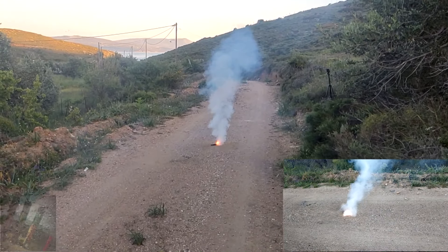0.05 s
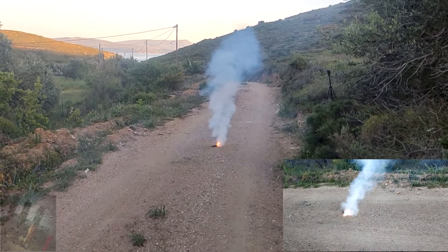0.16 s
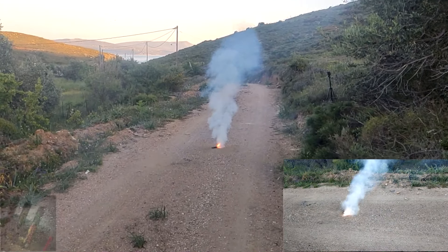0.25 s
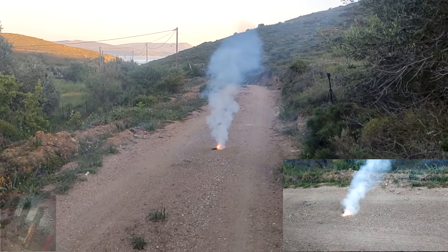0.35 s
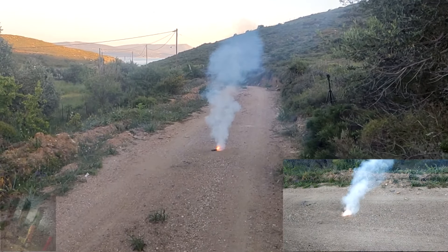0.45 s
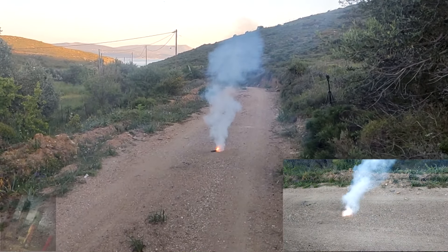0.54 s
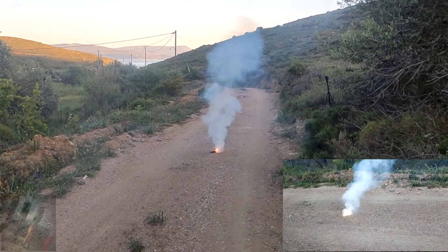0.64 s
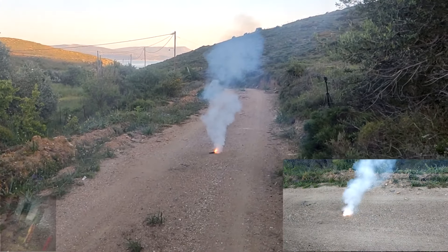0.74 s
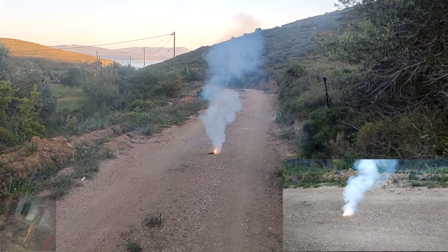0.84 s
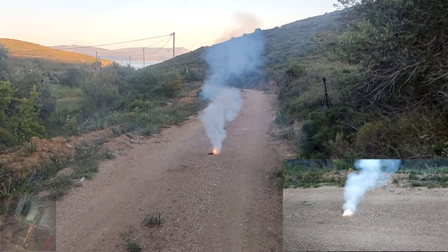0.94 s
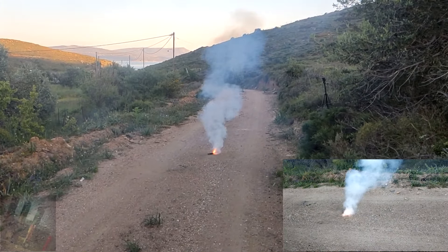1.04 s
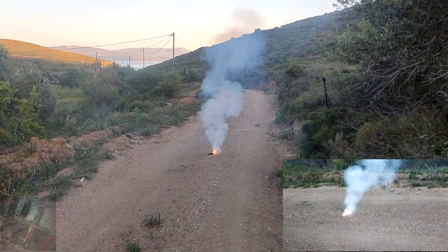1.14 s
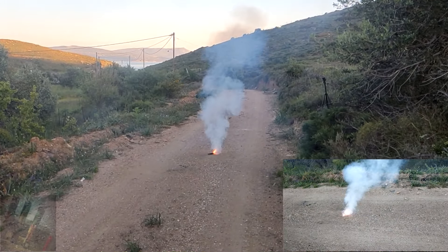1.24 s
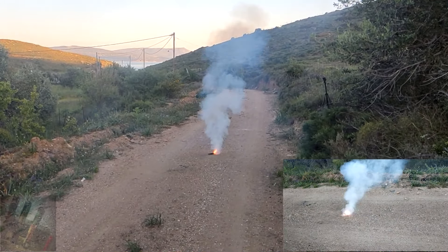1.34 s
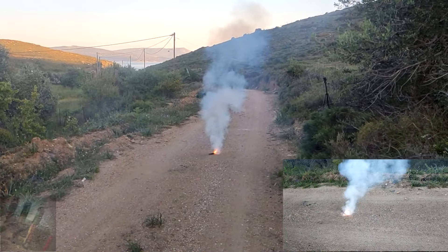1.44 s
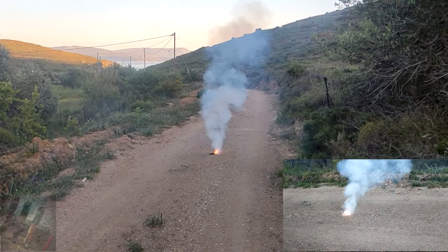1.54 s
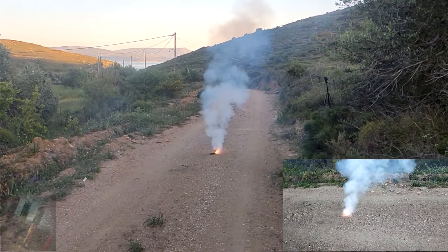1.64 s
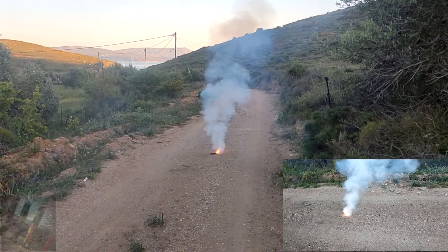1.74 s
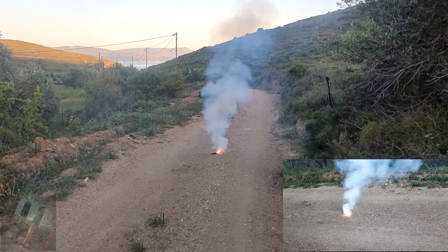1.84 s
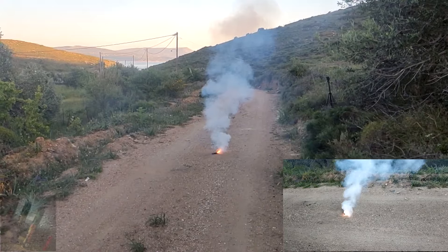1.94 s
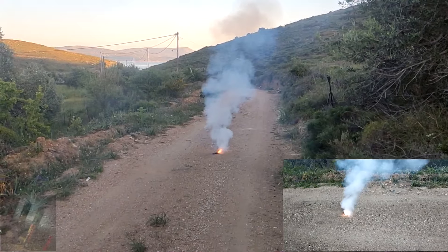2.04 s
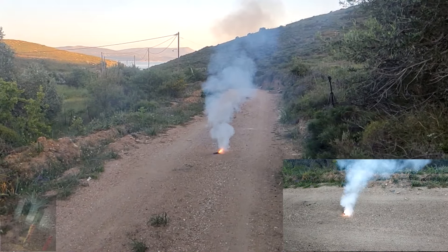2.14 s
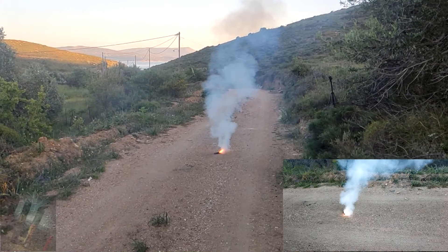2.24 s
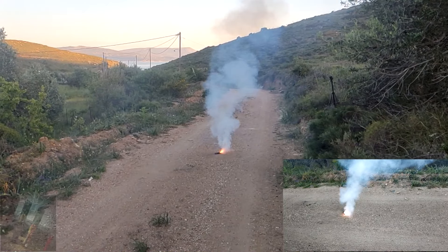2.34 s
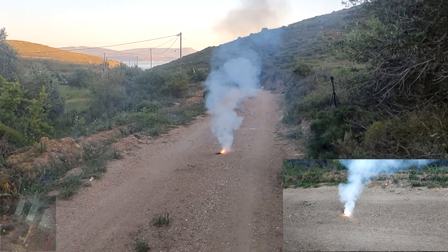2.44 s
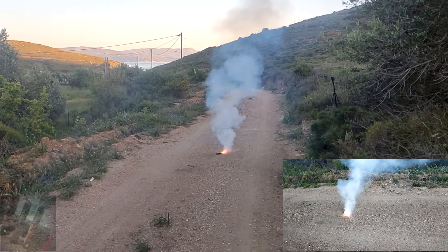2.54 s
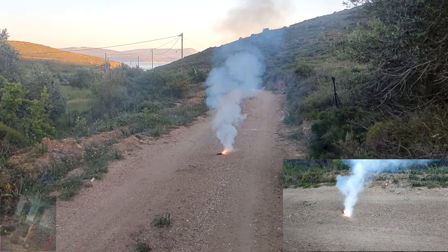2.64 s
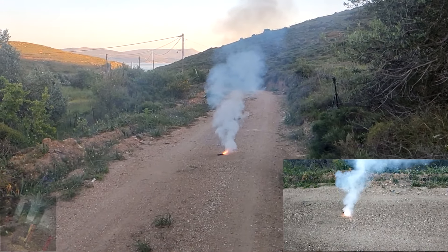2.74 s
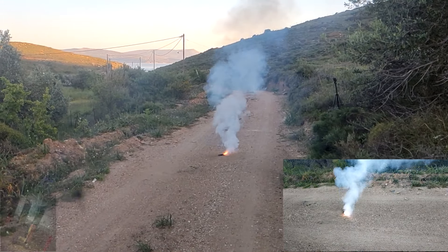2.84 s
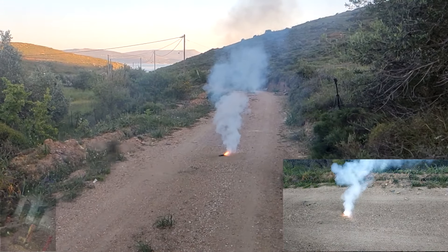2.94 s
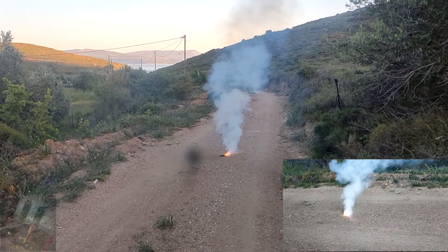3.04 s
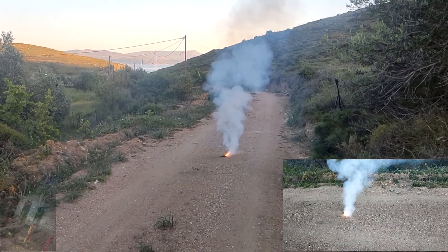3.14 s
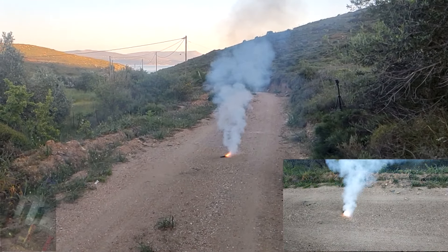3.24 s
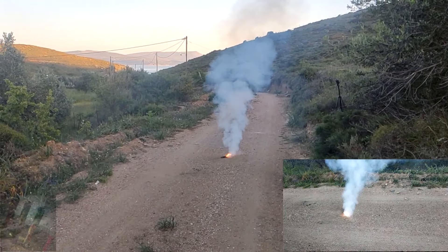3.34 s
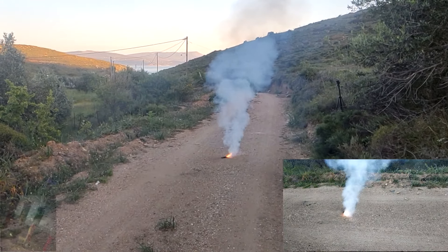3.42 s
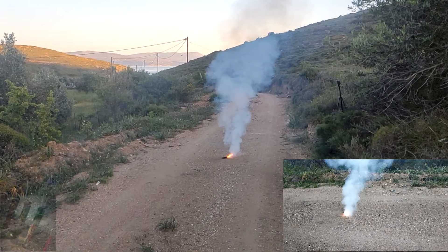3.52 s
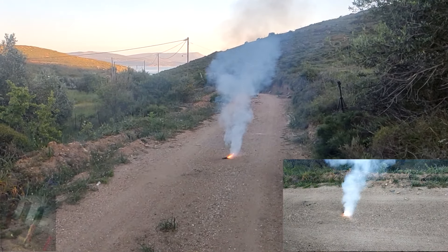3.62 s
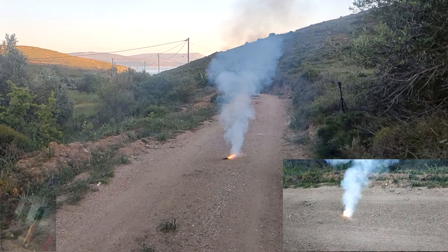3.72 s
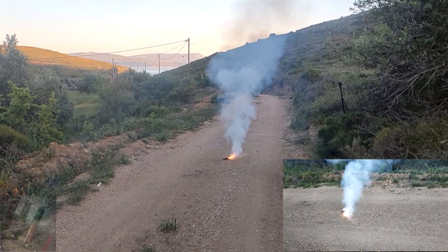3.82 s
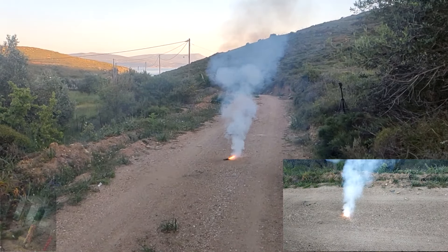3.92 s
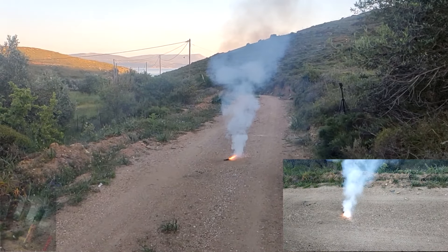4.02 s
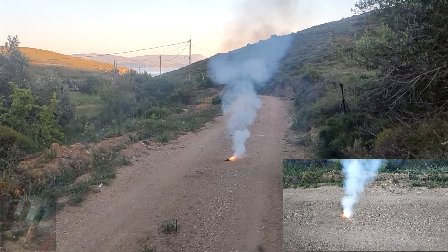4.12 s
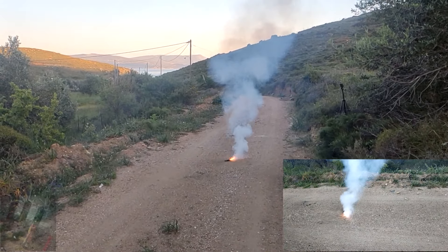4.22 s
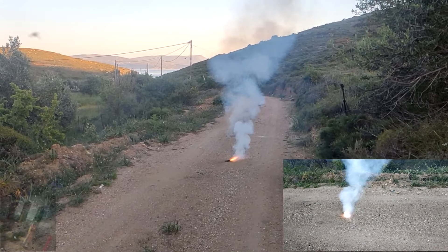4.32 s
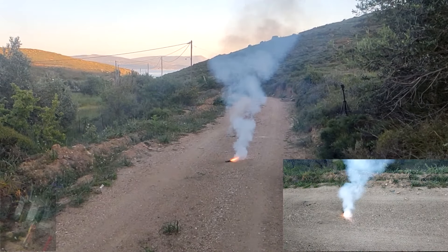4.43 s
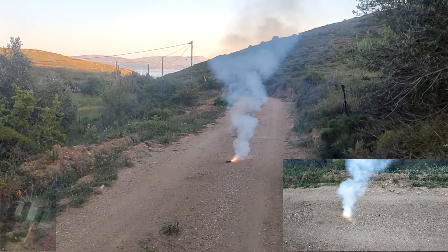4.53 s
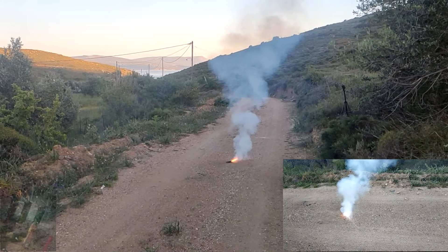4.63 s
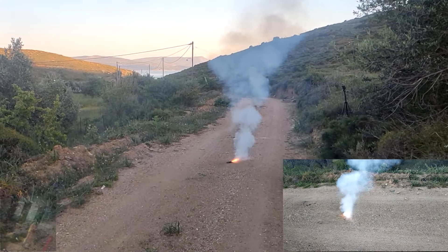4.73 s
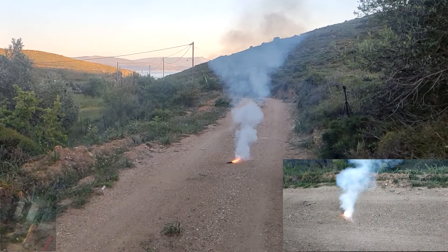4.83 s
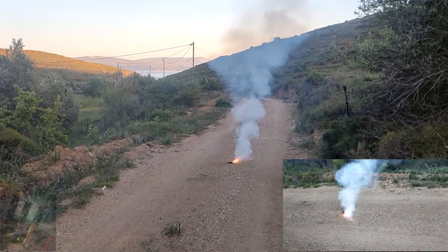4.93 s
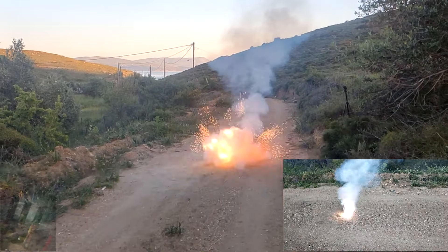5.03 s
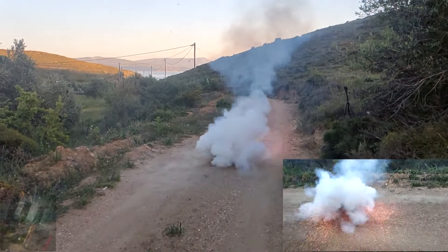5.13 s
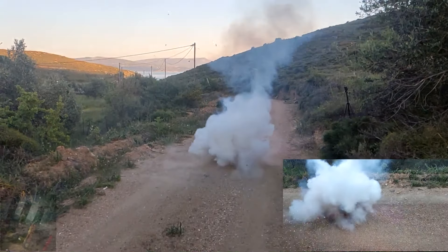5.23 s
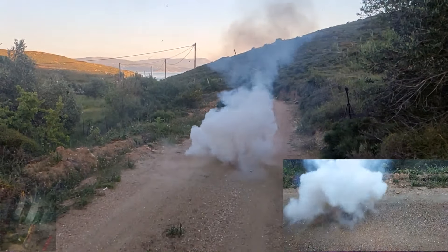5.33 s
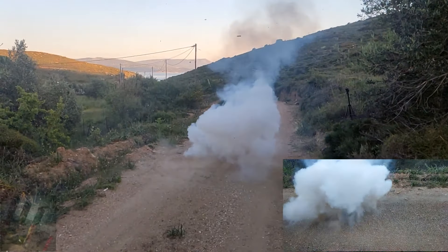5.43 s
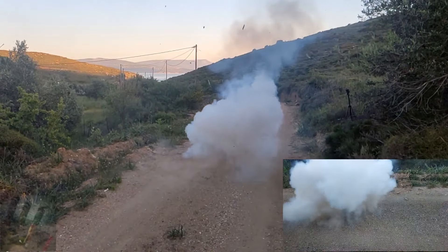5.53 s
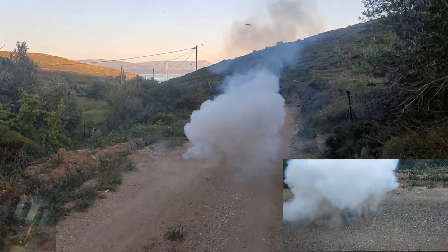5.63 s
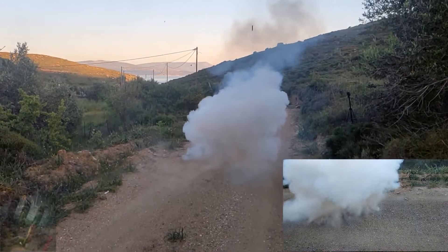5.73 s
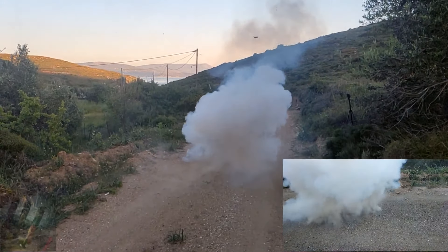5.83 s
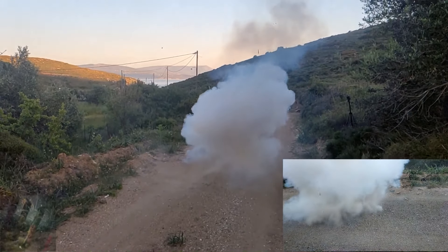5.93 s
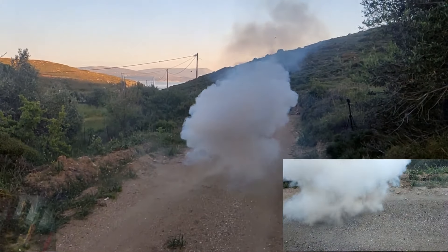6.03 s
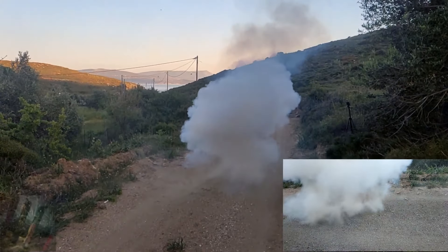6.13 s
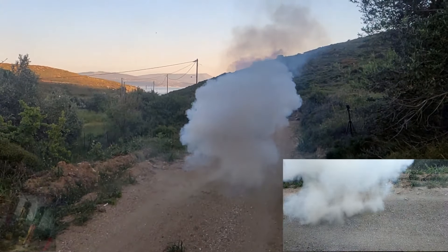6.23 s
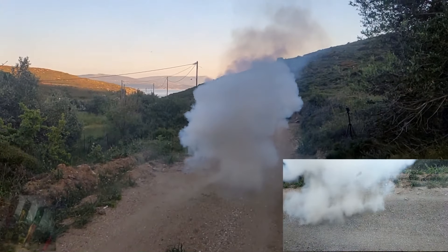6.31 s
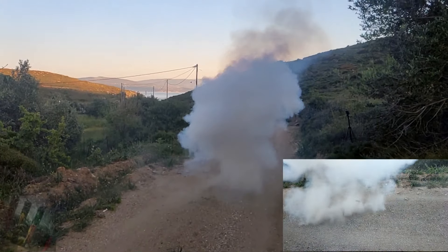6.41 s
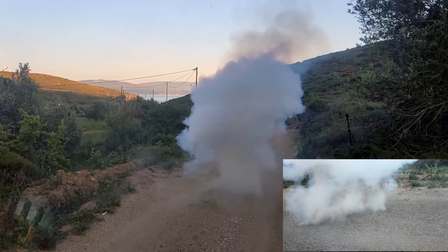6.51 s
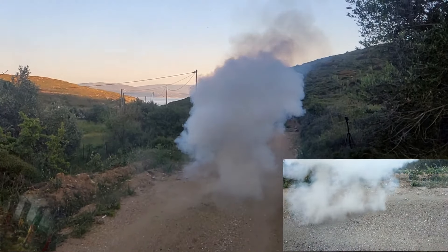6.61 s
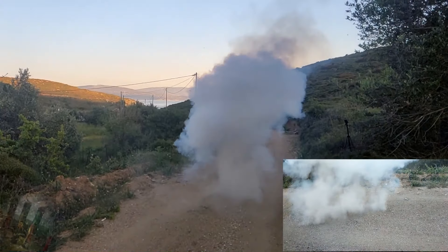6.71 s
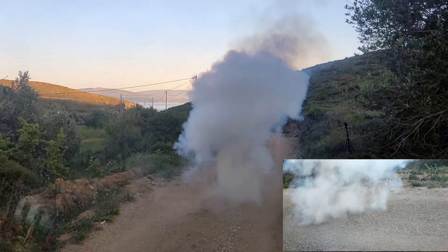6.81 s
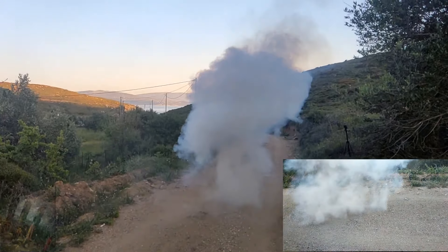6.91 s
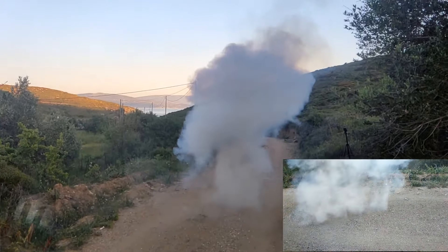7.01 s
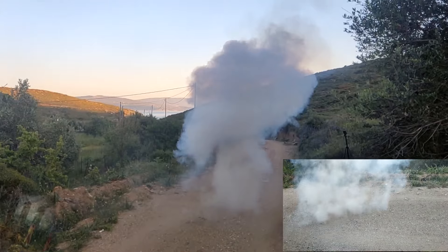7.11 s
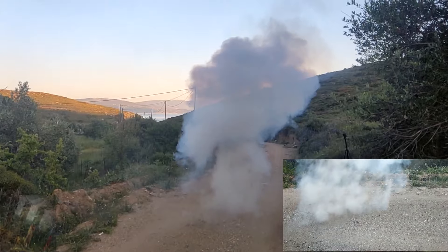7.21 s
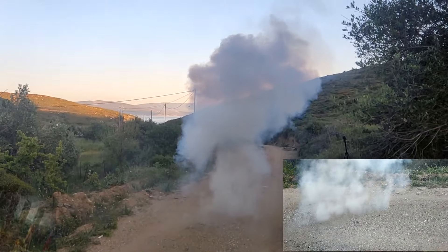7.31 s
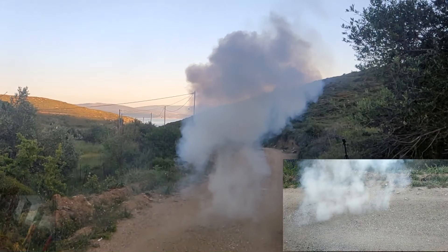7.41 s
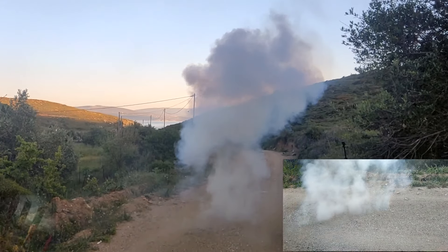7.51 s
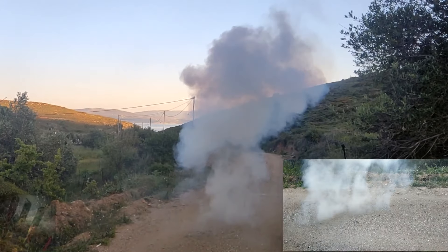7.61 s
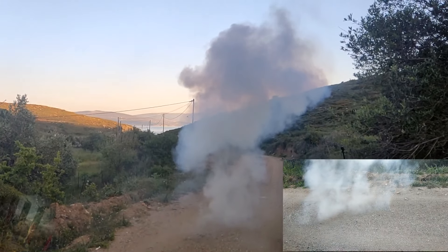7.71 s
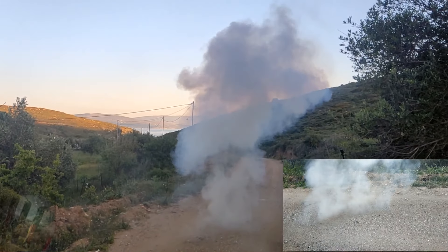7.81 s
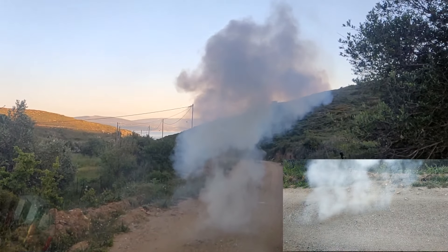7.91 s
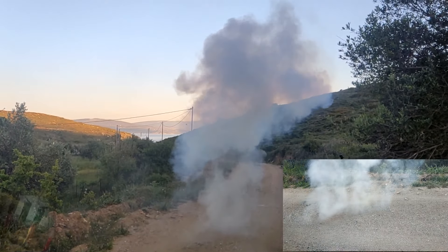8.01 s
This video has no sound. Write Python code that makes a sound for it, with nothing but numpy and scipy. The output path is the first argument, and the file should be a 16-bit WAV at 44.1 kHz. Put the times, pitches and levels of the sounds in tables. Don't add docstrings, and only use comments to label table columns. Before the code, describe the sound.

From 0 to 5.1 seconds a firecracker fuse hisses steadily on a dirt road, a bright gas jet that turns fuller and throatier between about 1.2 and 3.6, with a low fluttering flame slowly growing. Irregular dry snaps and ticks spit from it, strongest from 4.3 onward. A faint hand bump comes at 1.2; a cricket gives thin, high rasping chirps from 1.7 to 3.2. At 5.12 a single violent bang clips the phone microphone, with tightly packed ground bounces. Dense echoes roar back, with hard slaps on the right around 5.4 to 5.55, more near 5.7 to 5.85, and another clear one at 6.05. The roll grows duller and falls away by 6.5. Cricket chirps return from 5.7, grit ticks and dust patters, and a soft far-ridge rumble lingers after 6.8, over faint airy hiss.

```python
import sys
import numpy as np
from scipy import signal
from scipy.fft import rfft, irfft
from scipy.io import wavfile
from scipy.ndimage import uniform_filter1d

SR = 44100
rng = np.random.default_rng(int(sys.argv[2]) if len(sys.argv) > 2 else 0)


def wrap_up_sound(samples):
    columns = np.atleast_2d(samples).T
    tamed = np.clip(columns, -1, 1)
    steps = np.round(tamed * 32767).astype(np.int16)
    wavfile.write(sys.argv[1], SR, steps)


def voltage_ratio(level):
    return 10 ** (np.asarray(level, float) / 20)


N = 355446
T = np.arange(N) / SR
BANG_S = 5.1218
PORT_LAG = 19


def unit(x):
    return x / np.sqrt(np.mean(x ** 2))


def noise():
    return rng.standard_normal(N)


def colour(x, points):
    hz, db = np.transpose(points)
    grid_hz = np.arange(2049) * SR / 4096
    gain_db = np.interp(np.log(grid_hz + 1), np.log(hz), db)
    cepstrum = irfft(gain_db * np.log(10) / 20)
    cepstrum[1:2048] *= 2
    cepstrum[2049:] = 0
    impulse = irfft(np.exp(rfft(cepstrum)))
    return signal.fftconvolve(np.atleast_2d(x), impulse[None], axes=1)[:, :N]


def band(x, lo_hz, hi_hz, order=2):
    edges_hz = [lo_hz, min(hi_hz, .45 * SR)]
    return signal.sosfilt(signal.butter(order, edges_hz, "bandpass", fs=SR, output="sos"), x)


def walk(rate_hz):
    k = int(SR / rate_hz)
    held = np.repeat(rng.standard_normal(N // k + 1), k)
    return uniform_filter1d(uniform_filter1d(held, k), k)[:N]


def clicks(rate_hz, spread_db, size=N):
    u, big = rng.random(size), rng.exponential(size=size)
    sign = np.where(u * SR / rate_hz < .5, 1, -1)
    return unit((u < rate_hz / SR) * voltage_ratio(spread_db * np.minimum(big, 4)) * sign)


def pair(one, alike, lag=0):
    same, a = one(), np.clip(alike, 0, 1)
    shared = np.array([np.roll(same, lag), same])
    return np.sqrt(a) * shared + np.sqrt(1 - a) * np.array([one(), one()])


def add(out, start_s, sound):
    i = int(start_s * SR)
    out[:, i:i + sound.shape[1]] += sound[:, :N - i]


def sides(pan_db):
    return voltage_ratio(np.array([[pan_db / 2], [-pan_db / 2]]))


# [hz, level_db]
FRESH_JET = [(700, -38.5), (1500, -11.5), (2800, -9.5), (4100, -7), (5500, -4.5), (6800, -4), (8000, -6),
             (9200, -10), (10200, -7.5), (11400, -9.5), (12500, -10), (14500, -10.5)]
# [hz, level_db]
BURNT_JET = [(500, -21), (850, -4.5), (1300, -16.5), (1600, -5), (2000, -8.5), (3300, -3.5), (4200, 0),
             (6000, -4), (7300, -7.5), (9100, -10.5), (10200, -10), (11400, -8), (12500, -9.5), (14500, -6)]
# [hz, level_db]
FLAME = [(24, -40.5), (40, -4.5), (173, 2), (322, -4), (384, -12), (528, -5), (681, -8), (865, -24),
         (1060, -16.5), (1640, -25.5), (1800, -40.5), (2340, -47), (3960, -120)]
# [start_s, peak_db, left_minus_right_db]
SPITS = [(0.068, -32, -13), (0.111, -25, -9), (0.8787, -34.5, -1), (1.1697, -29, -7), (1.1899, -25.5, -2),
         (1.2411, -29, -1), (1.3102, -27, -5.5), (1.3969, -21, -3), (1.497, -26.5, -1.5), (2.1189, -27, -8),
         (2.3784, -25.5, -7), (2.743, -27.5, -0.5), (2.9585, -27.5, -2), (3.2094, -27, 6.5),
         (3.3936, -23, -1.5), (3.492, -28, -4.5), (3.6122, -27, -5), (3.6747, -27.5, -2.5),
         (3.9373, -28, -6.5), (3.9845, -24, -4), (4.0868, -27.5, -2), (4.2788, -15, -6), (4.358, -17.5, -2),
         (4.4638, -23, -5), (4.6006, -29.5, -4.5), (4.6395, -24, -4), (4.8689, -19.5, -6),
         (4.9368, -27, -2), (5.0045, -24.5, -2.5)]
# [start_s, peak_db]
TICKS = [(0.3588, -33), (0.397, -28.5), (0.606, -30), (0.726, -31), (1.0193, -31.5), (1.0548, -29),
         (1.0861, -32.5), (1.136, -31), (1.23, -36), (1.4674, -33.5), (1.5523, -31.5), (2.164, -31),
         (2.186, -30), (2.247, -31), (2.3003, -32), (2.4725, -33), (2.705, -31), (2.863, -32.5),
         (3.092, -32), (3.291, -31.5), (3.499, -30.5), (3.802, -37.5), (3.8122, -28.5), (3.867, -30),
         (3.9723, -30.5), (4.2321, -28.5), (4.564, -32.5), (4.6269, -30), (4.9038, -30), (4.968, -34),
         (0.1286, -37), (0.5372, -40.5), (0.7048, -35), (1.1158, -36.5), (1.9751, -42), (2.0545, -34),
         (2.3511, -32.5), (2.5441, -34.5), (2.6038, -38), (3.2091, -31), (3.211, -31.5), (3.181, -36.5),
         (3.195, -35.5), (3.1992, -34.5), (3.2864, -35.5), (3.5251, -37), (3.5441, -33.5), (3.747, -32),
         (3.914, -38.5), (4.2534, -35), (4.4487, -31.5), (4.7314, -32.5), (4.8394, -39.5), (4.885, -33.5),
         (5.0614, -37), (5.077, -37)]
# [start_s, peak_db]
POPS = [(1.3972, -46), (4.6, -16.5), (4.8394, -48.5), (2.9, -22.5), (4.6394, -35), (3.1, -34.5),
        (4.358, -35.5), (4.8692, -27.5), (5.0045, -37)]


def fuse():
    jet_db = -58 + 9.5 * np.exp(-T / 0.0222)
    flame_db = -59.5 + 1.0557 * T + 2 * np.exp(-np.abs(BANG_S - T) / .1)
    sparks = pair(lambda: clicks(1400, 2.2), 0.85)
    gas = pair(noise, 0.22) * voltage_ratio(1.5 * walk(22)) + 0.85 * sparks
    burnt = np.clip((T - 1.2) / 2.4, 0, 1)
    jet = (1 - burnt) * unit(colour(gas, FRESH_JET)) + burnt * unit(colour(gas, BURNT_JET))
    flame = unit(colour(pair(noise, 0.922), FLAME)) * voltage_ratio(1.8 * walk(17))
    out = (T < BANG_S) * (jet * voltage_ratio(jet_db) + flame * voltage_ratio(flame_db))

    snap, thud = np.zeros((2, 2, N))
    for start_s, peak_db, pan_db in SPITS:
        add(snap, start_s + 0.0013, voltage_ratio(peak_db + 2) * sides(pan_db + 4.5))
    for start_s, peak_db in TICKS:
        add(snap, start_s + 0.0023, voltage_ratio(peak_db + 1.37) * sides(-1.5))
    for start_s, peak_db in POPS:
        add(thud, start_s + 0.001492, voltage_ratio(peak_db) * sides(0))
    thud = thud + voltage_ratio(-34) * snap.mean(axis=0)
    t = np.arange(2000) / SR
    decay = np.exp(-t / 0.0022) * voltage_ratio(-26) + np.exp(-t / 0.018) * voltage_ratio(-37.5)
    smear = rng.standard_normal((2, 2000)) * decay
    snap = snap + signal.fftconvolve(snap, smear, axes=1)[:, :N]
    return out + band(snap, 1900, 11000, order=1) + band(thud, 990, 2550)


# [hz, level_db]
VALLEY = [(530, -26), (900, 3.5), (3290, -6.5), (4600, -14.5), (4990, -4.5), (7140, -16.5), (10600, -11),
          (14300, -2.5)]


def air():
    hiss = unit(colour(rng.standard_normal((2, N)), [(300, -41.0)] + VALLEY)) * voltage_ratio(-67.5)
    wind = unit(band(pair(noise, .4), 4, 45)) * voltage_ratio(-67 + 3 * walk(7.5)) * sides(3)
    drift = unit(band(pair(noise, 0.59), 0.978, 4.6, order=1)) * voltage_ratio(-54) * sides(5.4)
    since_s = np.clip(T - 1.215, 0, None)
    bump = voltage_ratio(-38.5) * np.sin(2 * np.pi * 45 * since_s) * np.exp(-since_s / 0.0356)
    return hiss + wind + drift + bump


# [start_s, level_db]
CHIRPS = [(1.729, -54.5), (1.7832, -45.5), (1.9527, -47.5), (2.1271, -45.5), (2.2962, -46.5), (2.4663, -48),
          (2.6452, -47.5), (2.819, -48), (3.005, -46.5), (3.1889, -46.5), (5.6594, -52), (5.8356, -47.5),
          (6.0102, -48.5), (6.1854, -47.5), (6.3579, -46.5), (6.5403, -46.5), (6.7095, -44.5),
          (6.8995, -46), (7.0888, -47.5), (7.2843, -60), (7.5682, -61), (7.7483, -61), (7.92, -63)]
# [hz, level_db]
WING = [(9000, -33), (11500, -17), (12300, -7.5), (13200, -7), (13900, -1), (15000, 3.5)]


def cricket():
    teeth = np.zeros((2, N))
    for start_s, level_db in CHIRPS:
        jitter = rng.standard_normal((2, 40))
        for k, d in enumerate(np.arange(0, .076, .0058)):
            fade_db = -62 * d - 4 * max(d - .06, 0) / .006
            tooth_db = level_db + 1 + fade_db + 1.2 * jitter[1, k]
            add(teeth, start_s + d + .0006 * jitter[0, k], voltage_ratio(tooth_db) * sides(-6.5))
        for early_s, soft_db in ((.049, -11), (.043, -11), (.039, -6), (.035, -6)):
            add(teeth, start_s - early_s, voltage_ratio(level_db + soft_db) * sides(-8))
    ring = signal.lfilter([1], [1, -np.exp(-1 / SR / 0.0044)], teeth)
    return colour(rng.standard_normal((2, N)) * ring * voltage_ratio(8), WING)


def blast(width_s, rise=0.075):
    u = np.arange(int(12 * width_s * SR)) / SR / width_s
    wave = (1 - u / 1.3) * np.exp(-u / 1.3) * (1 - np.exp(-(u / rise) ** 2))
    return wave / wave.max()


# [delay_s, peak_db, width_s, suction_db]
BOUNCES = [(0, 7, 0.00077, 4), (.0052, 2, 0.0021, -12), (0.0111, -1, 0.00076, -14), (.021, -2.5, .001, -3),
           (0.0252, -7, .001, -19.5), (.031, 0.5, 0.0011, 0), (0.0414, -7, 0.0011, -7),
           (.0465, -5, .0013, -15), (.058, -6.5, .0014, -9), (0.0647, -8, .0013, -10.5),
           (.073, -12, .0013, -16.5)]


def bang():
    out = np.zeros((2, N))
    for delay_s, peak_db, width_s, suction_db in BOUNCES:
        add(out, BANG_S + delay_s, voltage_ratio(peak_db) * blast(width_s) * sides(0))
        add(out, BANG_S + delay_s + .0019, -voltage_ratio(suction_db) * blast(0.001243, rise=0.35) * sides(0))
    since_s = np.clip(T - BANG_S - .0004, 0, None)
    scrub = unit(band(pair(noise, 0.077), 2500, 14000)) * np.exp(-since_s / 0.0487) * voltage_ratio(-10)
    boom = unit(band(pair(noise, 0.93), 110, 520)) * np.exp(-since_s / 0.034) * voltage_ratio(-18)
    stones = pair(lambda: clicks(900, 3), .4)
    bank = unit(band(stones, 1250, 1950)) * np.exp(-since_s / 0.044) * voltage_ratio(-21)
    return out + (since_s > 0) * (scrub + boom + bank)


def returns(slopes, edges_hz, ranges, span_s, even=0):
    peak_s, level_db, rise_s, fall_s, tone_db = np.transpose(slopes)
    heard = (T > span_s[0]) & (T < span_s[1])
    t = T[heard][:, None]
    swell = np.exp(-2 * np.where(t < peak_s, (peak_s - t) / rise_s, (t - peak_s) / fall_s))
    out = np.zeros((2, N))
    for k, (alike, trim_db, tilt_db, rate_hz, loss_db_per_s, share) in enumerate(ranges):
        lo_hz, hi_hz = edges_hz[k:k + 2]
        swarm = lambda: clicks(rate_hz, 3.37, size=len(t)) + 0.56 * rng.standard_normal(len(t))
        part = colour(pair(swarm, alike, PORT_LAG), [(lo_hz, 0), (hi_hz, tilt_db)])[:, :len(t)]
        part = unit(band(part, lo_hz, hi_hz, order=3))
        power = uniform_filter1d((part ** 2).mean(axis=0) + 1e-3, size=int(3 * SR / lo_hz))
        part = unit(part / power ** (even / 2))
        level = np.sqrt(swell @ voltage_ratio(2 * (level_db + share * tone_db)))
        air_loss_db = loss_db_per_s * (t[:, 0] - peak_s[0])
        out[:, heard] += part * level * voltage_ratio(trim_db - air_loss_db + 1.744 * walk(25)[heard])
    return out


# [peak_s, level_db, rise_s, fall_s, brightness_db]
HILLS = [(5.15, -10, 0.0325, 0.0254, -3.5), (5.22, -27.5, 0.104, 0.0432, 9.5),
         (5.31, -33, 0.054, 0.147, 7.5), (5.4, -25, 0.096, 0.049, -10.5), (5.446, -21.5, 0.0589, 0.0424, 7),
         (5.525, -18, 0.101, 0.063, -1), (5.65, -28, 0.024, 0.127, 2.5), (5.712, -32, 0.038, 0.046, -6),
         (5.76, -30.5, 0.31, 0.342, 0), (5.85, -26, 0.149, 0.099, -6), (6.054, -34, 0.0088, 0.052, -2),
         (6.2, -42, 0.12, 0.091, 5), (6.59, -65, 0.029, 0.033, 19), (6.28, -49.5, .05, 0.081, -5),
         (6.38, -49.5, .05, 0.106, 1)]
HILL_EDGES_HZ = [260, 900, 1900, 4500, 15000]
# [likeness, level_db, tilt_db, rate_hz, air_loss_db_per_s, brightness_share]
HILL_RANGES = [(0.714, -1.5, 0, 440, 2, 0.33), (0.13, -6, -4.5, 1000, 2, 0.48),
               (0.17, -7.5, -3.5, 1100, 6, 1), (0.21, -11, -8.5, 7600, 14.5, 1.34)]
# [peak_s, level_db, rise_s, fall_s, boom_db]
RIDGE = [(6.81, -58, 0.027, 0.083, -10.5), (6.87, -51.5, 0.043, 0.21, -5.5),
         (7.09, -50.5, 0.114, 0.22, 0.5), (7.29, -51, 0.122, 0.153, 5.5), (7.385, -55.5, 0.064, 0.055, 14),
         (7.55, -58.5, 0.0877, 0.28, 10), (7.75, -54.5, 0.061, 0.13, 3), (7.94, -58, 0.17, 0.2, 10.5)]
RIDGE_EDGES_HZ = [30, 170, 420, 900, 5500]
# [likeness, level_db, tilt_db, rate_hz, air_loss_db_per_s, boom_share]
RIDGE_RANGES = [(1, -0.81, -11.5, 1400, -2, 0.092), (0.977, -0.07, -5, 500, -0.72, 0.953),
                (0.995, 3.5, -3.5, 1100, -0.5, 0.01), (0.344, -1, -23, 1300, 1.5, 0.35)]
# [start_s, peak_db, width_s, bearing (0 ahead, 1 right)]
SLAPS = [(5.404, -18.5, .0003, 0.89), (5.416, -3.5, 0.000474, 1), (5.422, -14.5, 0.00067, 0.92),
         (5.45, -3, 0.000324, 1), (5.494, -5.5, 0.000374, 1), (5.508, -17, 0.00114, 0.81),
         (5.5094, -0.5, 0.0008, 1), (5.519, -5, 0.000324, 1), (5.539, -2.5, 0.000208, 1),
         (5.652, -17, 0.00021, 0.35), (5.684, -17, 0.00036, 0.31), (5.7057, -10.5, 0.000204, 0.383),
         (5.815, -16.5, 0.00044, 0.475), (5.8396, -11, 0.00032, 0.296), (5.8444, -13.5, 0.000258, 0.35),
         (5.849, -14.5, 0.00028, 0.4), (5.877, -11.5, 0.000225, 0.864), (5.924, -16.5, 0.00037, 0.924),
         (6.037, -16.5, 0.000262, 0.884), (6.052, -7.5, 0.000233, 0.88), (6.0551, -2, 0.000251, 0.997),
         (6.0566, -14, 0.00058, 0.88), (6.072, -16, 0.000283, 0.716), (6.162, -21.5, 0.000307, 0.56),
         (6.216, -26, 0.00037, 0.42), (6.321, -30.5, 0.000326, 0.354), (6.556, -37, 0.00054, 0.56),
         (6.801, -33, 0.00034, 0.596), (6.998, -30.5, 0.00059, 0.67), (7.371, -26, 0.00064, 0.97)]


def hills():
    near = returns(HILLS, HILL_EDGES_HZ, HILL_RANGES, (5, 7.4))
    eaten = 1 - np.exp(-np.clip(T - BANG_S, 0, None) / 0.21)
    high = signal.butter(4, 11500, "high", fs=SR, output="sos")
    near = near - eaten * signal.sosfiltfilt(high, near)
    far = np.clip((T - 6.7) / .05, 0, 1)
    out = near * (T > BANG_S + .004)
    out += far * returns(RIDGE, RIDGE_EDGES_HZ, RIDGE_RANGES, (6.65, 9), even=.3)

    faces = np.zeros((2, N))
    for start_s, peak_db, width_s, bearing in SLAPS:
        pulse = voltage_ratio(peak_db) * np.pad(blast(width_s, rise=.5), (0, PORT_LAG))
        add(faces, start_s, np.array([np.roll(pulse, int(PORT_LAG * min(bearing, 1))), pulse]))
    decay = np.exp(-np.arange(3000) / SR / 0.0402) * voltage_ratio(-34)
    rattle = clicks(2500, 6.1, size=3000)[None] * decay
    trail = signal.fftconvolve(faces, rattle, axes=1)[:, :N]
    return out + band(faces, 172, 6970, order=1) + band(trail, 520, 3800, order=1)


# [start_s, peak_db, pitch_hz, length_s]
HOLLOWS = [(5.426, -19, 701, 0.0045), (5.465, -17.5, 750, 0.0064), (5.485, -17.5, 1510, 0.0043),
           (5.505, -8.5, 317, 0.0078), (5.7946, -27.5, 1078, .008), (5.8128, -30.5, 945, .008),
           (5.8966, -31, 1030, .008), (5.92, -28.5, 1090, 0.0079), (5.6318, -26.5, 1530, .005),
           (5.697, -20.5, 109.7, 0.024), (5.796, -21, 118, 0.028), (5.838, -19, 89.8, 0.0293),
           (5.556, -16.5, 131, 0.0115), (5.426, -13, 109.6, 0.0152), (5.566, -21.5, 1042, .006),
           (5.652, -24, 1140, 0.0061), (5.683, -24.5, 1156, 0.0053), (5.703, -18.5, 1043, 0.0133),
           (5.84, -13.5, 1070, 0.0156), (5.834, -28, 1595, 0.0058), (5.878, -21.5, 619, 0.0147),
           (6.06, -27.5, 1470, 0.022), (6.056, -25, 626, 0.046), (6.066, -30, 2420, 0.016),
           (6.114, -27, 634, 0.0127), (6.161, -30.5, 744, 0.014), (6.214, -31, 706, 0.0097),
           (6.317, -33, 630.3, 0.01), (6.553, -41, 653, 0.0164), (6.554, -45, 1200, .014),
           (6.553, -46.5, 379, 0.013), (6.317, -41.5, 1536, .006), (6.598, -46.5, 2606, 0.0041),
           (6.759, -43.5, 901, 0.023), (6.8, -43, 596, 0.011), (6.831, -45, 665, 0.023),
           (6.859, -54, 2300, 0.0073), (7.27, -46.5, 300, .04), (7.332, -42.5, 292, .045),
           (7.44, -46, 270, .045), (7.547, -45, 260, .04), (7.301, -52, 620, 0.029),
           (5.853, -20.5, 1007, 0.0135)]
# [peak_s, level_db, rise_s, fall_s, brightness_db]
DEEP = [(5.145, -16.5, 0.013, 0.052, 4), (5.22, -28.5, .05, 0.069, -1.5), (5.31, -28.5, 0.052, .1, 1.5),
        (5.4, -22.5, 0.062, 0.068, 1.5), (5.45, -21, 0.045, 0.055, -2), (5.52, -21.5, 0.084, 0.087, -0.5),
        (5.62, -27.5, .04, .08, 0.5), (5.7, -24.5, 0.046, 0.048, -4), (5.8, -28.5, 0.078, 0.057, 1),
        (5.87, -27, .05, 0.133, -4), (6.05, -39, 0.053, 0.075, -1), (6.2, -36, 0.063, 0.067, -5.5),
        (6.27, -38.5, 0.038, 0.114, -5), (6.45, -47.5, 0.093, 0.12, -2), (6.65, -50, 0.097, 0.19, -8.5),
        (6.85, -54.5, .1, 0.28, -9)]
DEEP_EDGES_HZ = [28, 60, 135, 260]
# [likeness, level_db, tilt_db, rate_hz, air_loss_db_per_s, brightness_share]
DEEP_RANGES = [(.93, -4.5, -0.093, 300, 0, -0.42), (0.91, -1.42, 0.93, 300, 0, -0.12),
               (0.988, -2, -1.5, 330, 0, 1.01)]
# [below_hz, build_up_s]
LOWS_LATE = [(60, 0.36), (125, .05)]


def hollows():
    out, t = np.zeros((2, N)), np.arange(4000) / SR
    for start_s, peak_db, pitch_hz, length_s in HOLLOWS:
        burst = band(rng.standard_normal(5000), pitch_hz / 1.11, pitch_hz * 1.11)
        burst = (burst / np.abs(signal.hilbert(burst)) ** .7)[-4000:]
        burst = burst * np.exp(-(t / length_s) ** 2) * (1 - np.exp(-t * pitch_hz / 1.5))
        both = np.array([np.roll(burst, PORT_LAG), burst])
        add(out, start_s, voltage_ratio(peak_db) * both / np.abs(burst).max())
    deep = returns(DEEP, DEEP_EDGES_HZ, DEEP_RANGES, (5, 7.4), even=.7)
    for below_hz, build_up_s in LOWS_LATE:
        low = signal.sosfiltfilt(signal.butter(2, below_hz, fs=SR, output="sos"), deep)
        deep = deep - np.exp(-((T - BANG_S) / build_up_s) ** 2) * low
    return out + (T > BANG_S + .004) * deep


# [start_s, peak_db, left_minus_right_db, knock_db]
GRIT = [(5.8016, -27, 12, -11), (5.893, -31.5, -3, -6), (6.0511, -49.5, 0, -8), (6.1581, -37, -7, -7),
        (6.185, -29, 7, -25), (6.271, -31.5, -7.5, -13.5), (6.322, -37, 2.5, -13.5),
        (6.5013, -36.5, 10.5, -26.5), (6.5301, -45.5, 10, -31), (6.5971, -42, -1, -1),
        (6.6228, -38, 4.5, -11), (6.6736, -41.5, 3.5, -22.5), (6.7191, -41, 20, -24),
        (6.8183, -45, -13, -15), (6.8507, -47.5, -1, -14), (6.8991, -30.5, -2, -20), (6.928, -43, -4, -9),
        (7.0363, -53, -10, -12), (7.0549, -39, 9, -19.5), (7.2802, -29.5, 1.5, -18.5),
        (7.4924, -54.5, 2, -6), (7.5961, -42, -1.5, -19.5), (7.657, -32.5, -9, -32.5),
        (7.7645, -55, -0.5, -6)]


def grit():
    out, t = np.zeros((2, N)), np.arange(600) / SR
    for start_s, peak_db, pan_db, knock_db in GRIT:
        tick = band(rng.standard_normal((2, 600)), 7620, 11780)
        tick = tick * (np.exp(-t / 0.00062) + voltage_ratio(-17) * np.exp(-t / .004))
        knock = band(rng.standard_normal(600), 1200, 6230, order=1)
        knock = knock * np.exp(-t / 0.00218) * voltage_ratio(knock_db + 9)
        add(out, start_s, voltage_ratio(peak_db - 6) * (tick + knock) * sides(pan_db))
    dust = unit(band(pair(lambda: clicks(600, 4.3), .3), 9000, 13470)) * voltage_ratio(-66 + 2.5 * walk(6.5))
    return out + dust * (T > 5.7) * np.exp(-(T - 5.7).clip(0) / 0.88)


def scene():
    return fuse() + air() + cricket() + bang() + hills() + hollows() + grit()


# [hz, margin_db]
STARVE = [(1800, 60), (2300, 3), (2800, 2.2), (4300, 2.1), (4900, 2.5), (6000, 3.5), (7200, 5.5),
          (11000, 5), (12500, 2.6), (14000, 2.6)]
# [hz, margin_db]
STARVE_LATE = [(2000, 60), (2600, 4.5), (3600, 2.8), (4200, 2.3), (6300, 2), (7000, 4), (7600, 6),
               (11000, 5.5), (12500, 3.6), (14000, 3.6)]


def starve(x):
    hz, s, z = signal.stft(x, SR, nperseg=1024, noverlap=768)
    power = (np.abs(z[:, :510]) ** 2).reshape(2, 102, 5, -1).mean(axis=(0, 2))
    power = uniform_filter1d(power, 4, axis=1)
    band_hz = hz[2:510:5]
    early_db, late_db = (np.interp(band_hz, *np.transpose(m))[:, None] for m in (STARVE, STARVE_LATE))
    margin_db = np.where(s > 6.3, late_db, early_db + 1.5 * (s > 5.55))
    weak = power < voltage_ratio(-2 * margin_db) * uniform_filter1d(power, 7, axis=0)
    weak &= np.abs(s - BANG_S) > .04
    weak |= (band_hz[:, None] > 11800) & (power < voltage_ratio(-2 * 36) * power[1:].mean(axis=0))
    weak = uniform_filter1d(1. * weak, 5, axis=1) > .1
    z[:, :510] *= 1 - .99 * np.repeat(weak, 5, axis=0)
    return signal.istft(z, nperseg=1024, noverlap=768)[1][:, :N]


def roll_off(x):
    return signal.sosfilt(signal.butter(12, 16000, fs=SR, output="sos"), x)


# [pitch_hz, width_hz]
PORTS = [(10500, 2400), (8420, 900)]
# [hz, left_db, right_db]
PORT_TRIM = [(2000, -1.02, 0.1673), (4500, 0.5, -1.71), (6760, -1.5, 1.35), (7400, -0.5, -1),
             (9200, -1, 0.5), (10500, 1.5, -0.5), (11400, 0.5, 2.5), (12470, -2, 3), (13600, -1, 4)]


def record(dry):
    f = np.fft.rfftfreq(N, 1 / SR)
    hz, *trim_db = np.transpose(PORT_TRIM)
    trim = voltage_ratio(np.array([np.interp(f, hz, db) for db in trim_db]))
    cavity = np.array([1 - (f / p) ** 2 + 1j * f * w / p ** 2 for p, w in PORTS])
    x = irfft(rfft(dry) * trim / cavity, N)
    since_s = np.clip(T - BANG_S - .12, 0, None)
    sag = -.5 * (since_s / 0.18) ** 2 * np.exp(-since_s / 0.11)
    recovery = 0.0665 * since_s * np.exp(-since_s / .5) * np.array([[1.6], [1.]])
    x = np.clip(x + sag + recovery, -.9, .9)

    top = x - signal.sosfiltfilt(signal.ellip(10, .05, 45, 14260, fs=SR, output="sos"), x)
    sharp = uniform_filter1d(top ** 2, 44) > 7.2 * uniform_filter1d(top ** 2, 2200)
    sharp |= np.abs(T - BANG_S - .022) < .024
    kept = np.minimum(uniform_filter1d(1. * sharp, 88) * 4, 1)
    duck = np.where((T > BANG_S - 0.0077) & (T < BANG_S - .0012), voltage_ratio(-25.5), 1)
    mix = duck * (starve(x - top) + voltage_ratio(-13.5) * kept * top)
    return roll_off(mix)


dry = scene()
out = record(dry)
wrap_up_sound(out)
```